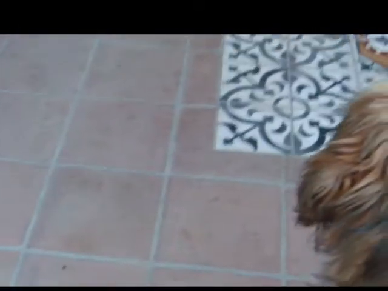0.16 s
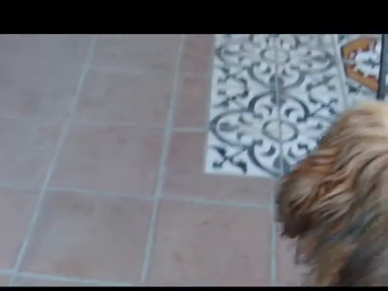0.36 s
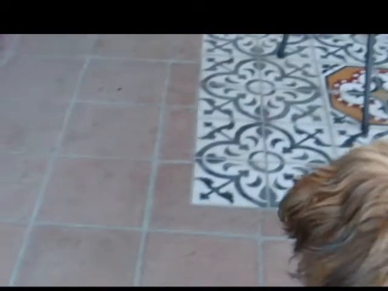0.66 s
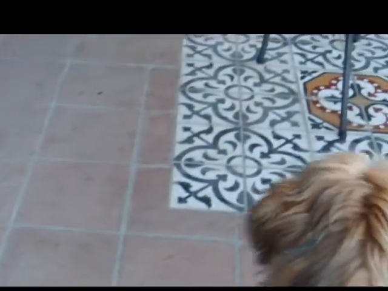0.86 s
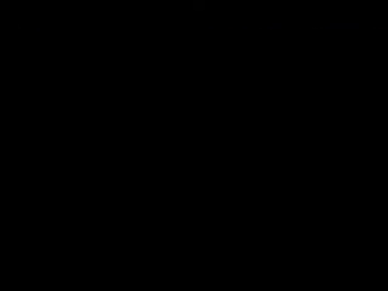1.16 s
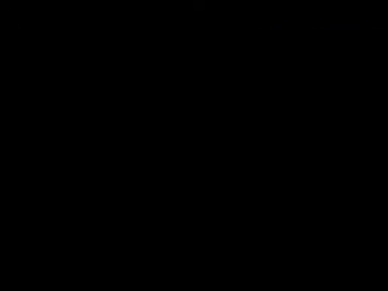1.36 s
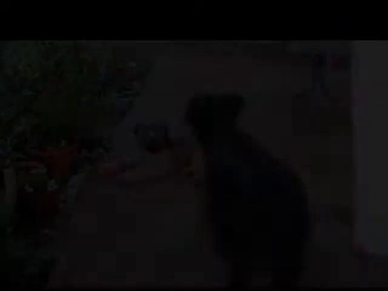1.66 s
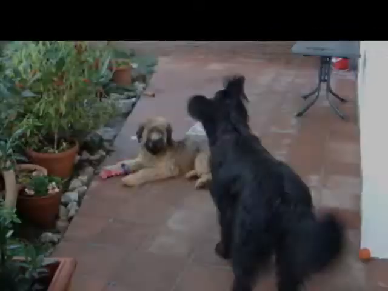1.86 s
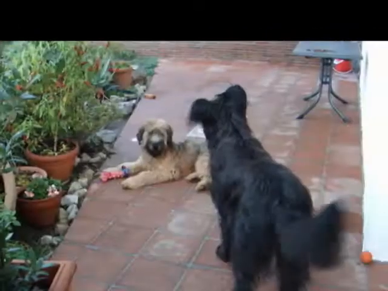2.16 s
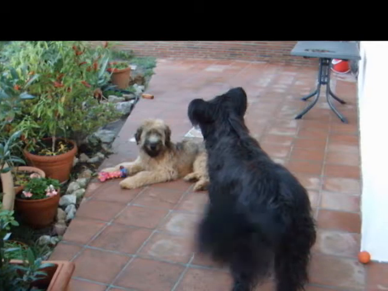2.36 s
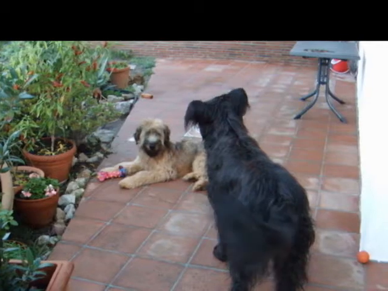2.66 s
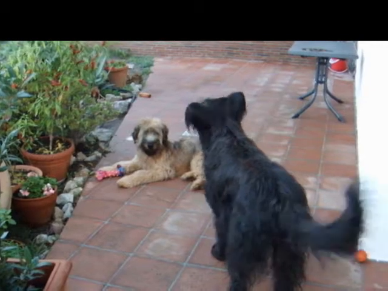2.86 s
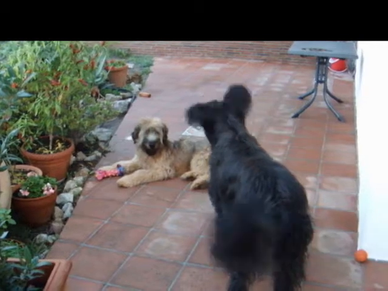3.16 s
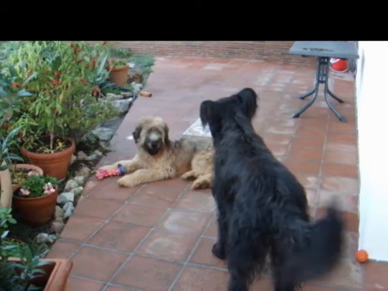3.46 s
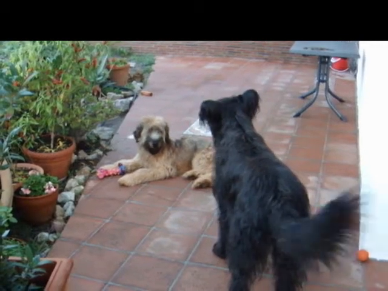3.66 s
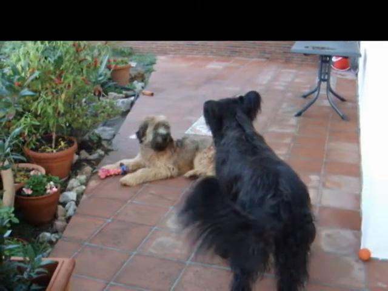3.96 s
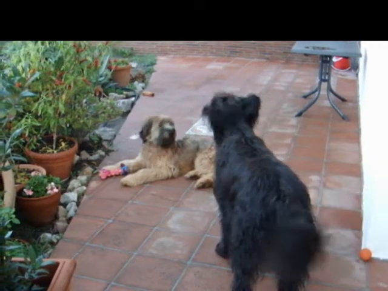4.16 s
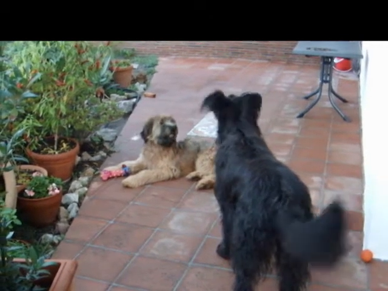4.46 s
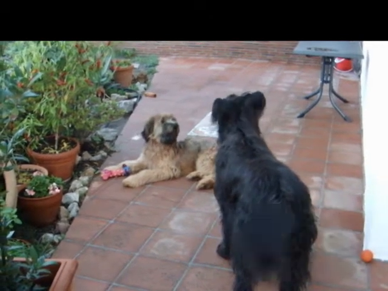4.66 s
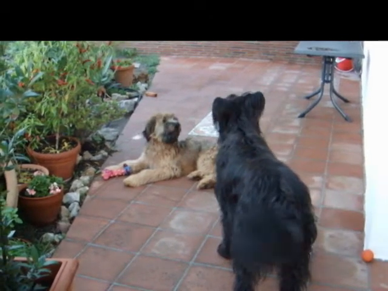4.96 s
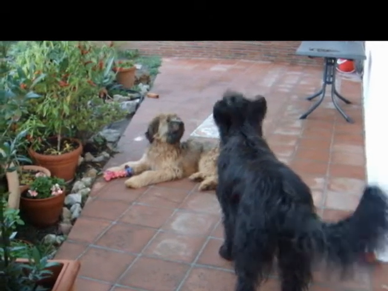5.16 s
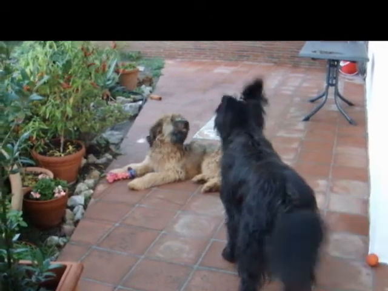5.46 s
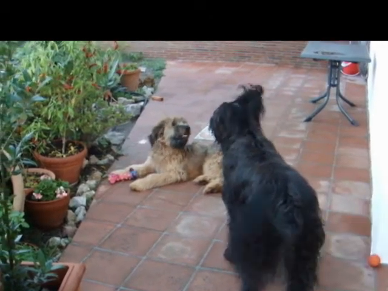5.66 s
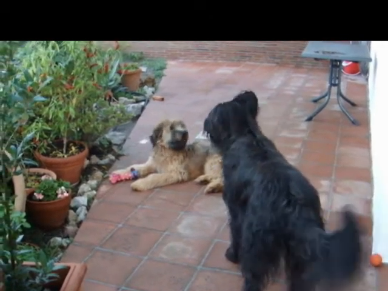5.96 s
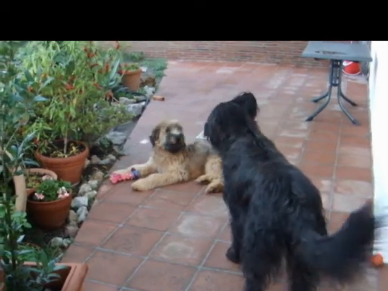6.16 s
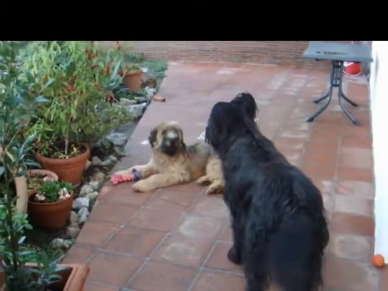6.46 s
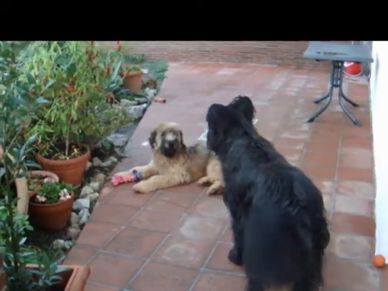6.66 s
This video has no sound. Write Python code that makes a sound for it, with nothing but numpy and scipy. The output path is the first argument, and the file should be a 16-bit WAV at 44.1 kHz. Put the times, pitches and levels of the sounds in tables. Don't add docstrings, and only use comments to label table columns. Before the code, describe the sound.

A large dog gives four loud single barks on a tiled terrace after a few sharp plastic clicks, with birds whistling and faint town hum.

```python
import sys
import numpy as np
from scipy import signal
from scipy.fft import rfft, irfft, next_fast_len
from scipy.io import wavfile
from scipy.ndimage import uniform_filter1d, map_coordinates

SR = 44100
rng = np.random.default_rng(int(sys.argv[2]) if len(sys.argv) > 2 else 0)


def rack_gain(trim_db):
    fader = np.asarray(trim_db, float)
    return 10 ** (fader / 20)


def pcm_store(signal):
    levels = np.round(np.clip(np.atleast_2d(signal), -1, 1) * 32767)
    wavfile.write(sys.argv[1], SR, levels.astype(np.int16).T)


N = 299698
T = np.arange(N) / SR

# full_voice_s, first_register_hz, second_register_hz, half_pitch_share (0-1), roughness (0-1)
BARK_VOICES = [
    (1.345, 604.5, 486.7, 0.14, .26),
    (2.62, 599.7, 495.4, 0.36, 0.37),
    (3.855, 600, 649.4, 0.56, 0.37),
    (4.89, 596.7, 505, 0.4, 0.29),
]


def unit(x):
    return x / np.sqrt(np.mean(np.abs(x) ** 2) + 1e-20)


def along(points, hz):
    point_hz, value = np.transpose(points)
    return np.interp(np.log(hz + 1), np.log(point_hz + 1), value)


def curves(rows, t=T):
    s, *columns = np.transpose(rows)
    return [np.interp(t, s, column) for column in columns]


def wobble(rate_hz, size=N):
    knots = rng.standard_normal(int(size * rate_hz / SR) + 4)
    return map_coordinates(knots, [np.arange(size) * rate_hz / SR])


def filtered(x, response):
    m = next_fast_len(len(x) + SR // 4)
    return irfft(rfft(x, m) * response(np.fft.rfftfreq(m, 1 / SR)), m)[:len(x)]


def resonances(modes, f):
    total = 0
    for k, (center_hz, width_hz, db) in enumerate(modes):
        damping = 1j * f * width_hz
        total = total + (-1) ** k * rack_gain(db) * damping / (center_hz ** 2 - f * f + damping)
    return total


def steep(f, low_hz, high_hz):
    return 1 / np.sqrt((1 + (low_hz / (f + 1)) ** 8) * (1 + (f / high_hz) ** 8))


def noise(response, patchy_db, size=N):
    z = signal.stft(rng.standard_normal(size + 512), nperseg=512)[2]
    field = uniform_filter1d(rng.standard_normal(z.shape), 6, 0)
    field = uniform_filter1d(field, 10, 1)
    patchy = signal.istft(z * rack_gain(patchy_db * unit(field)), nperseg=512)[1][:size]
    return unit(filtered(patchy, response))


def add(track, s, x):
    part = track[round(s * SR):][:len(x)]
    part += x[:len(part)]


def terrace(x, early_db, tail_db):
    # delay_s, level_db
    wall_echoes = [(.007, -18.5), (.013, -2.5), (.022, -7), (.037, -4), (.058, -10.5), (.092, -29.5),
                   (.17, -24.5), (.265, -32)]
    # frequency_hz, t60_s
    decay_times = [(200, 0.76), (500, 0.69), (1000, 0.51), (2000, 0.77), (6000, 0.18)]
    hz, t, z = signal.stft(rng.standard_normal(SR), SR, nperseg=256)
    decay_db = -60 * t / along(decay_times, hz)[:, None]
    answer = signal.istft(z * rack_gain(decay_db), SR, nperseg=256)[1][:SR]
    answer = rack_gain(tail_db) * answer / np.linalg.norm(answer)
    answer[0] = 1
    for delay_s, db in wall_echoes:
        answer[round(delay_s * SR)] += rack_gain(db + early_db)
    return signal.fftconvolve(x, answer)


def fold_registers(voice, flips, t):
    start_s, first_hz, second_hz, half, rough = voice
    flip_s, settle_s, onset_rough = 0.013, 0.031, 0.3
    first_pitch = first_hz * np.clip(1 - 0.06 * np.exp((start_s - t) / 0.015), 0.4, 1)
    second_pitch = second_hz * np.clip(1 - 0.35 * np.exp((start_s - t) / 0.022), 0.4, 1)
    surge_share, surge_after_s, surge_s = 0.0997, 0.0204, 0.01202
    first_pitch = first_pitch * (1 + surge_share * np.exp(-((t - start_s - surge_after_s) / surge_s) ** 2))
    first = np.full(len(t), 0.993)
    for s, share in flips:
        first = first + (share - first) * np.clip((t - s) / flip_s + 0.5, 0, 1)
    first = np.clip(first, 0, 1)
    second = np.sqrt(1 - first ** 2)
    rough = rough + onset_rough * np.exp(-np.maximum(t - start_s, 0) / settle_s)
    return [(first_pitch, first), (second_pitch, second)], half, rough


def dog():
    # time_s, level_db, mouth_opening_db
    bark_shapes = [
        [(1.24, -56, -3), (1.32, -40, -9), (1.35, -9.5, -13), (1.385, -17, 5.5), (1.41, -12, -8),
         (1.44, -20.5, 10.5), (1.47, -14.5, -2.5), (1.53, -25, -5.5), (1.56, -33.5, -30)],
        [(2.612, -51.5, -11), (2.622, -10, -10), (2.636, -12, -8), (2.665, -17, 6.5), (2.69, -12, -15),
         (2.72, -19, -3), (2.75, -14.5, -8.5), (2.81, -22.5, -12), (2.86, -54.5, -13)],
        [(3.842, -52, 0), (3.852, -21.5, -18), (3.89, -11, -8), (3.905, -26.5, 4), (3.918, -13, -6),
         (3.942, -25.5, 9.5), (3.96, -22, -14), (4.0, -36.5, 10), (4.04, -59.5, -8)],
        [(4.884, -37, -9), (4.895, -9.5, -12.5), (4.925, -18, 13), (4.945, -13, -5), (4.968, -22, 11),
         (4.985, -12.5, -7), (5.005, -23.5, -4), (5.03, -15.5, -1.5), (5.13, -45.5, -8)],
    ]
    # time_s, share left to the first register (0-1)
    register_flips = [
        [(1.391, 0.16)],
        [(2.652, 0.23)],
        [(3.9, 0.44), (3.95, 0.81)],
        [(4.92, .5), (4.945, 0.97), (5.015, 0.39)],
    ]
    yard_tail_db = [-16.5, -15, -28, -13.5]
    # frequency_hz, width_hz, level_db
    throat_modes = [(530.5, 173, 1.5), (1108, 470, -1), (1467, 410, -3.5), (1874, 168, -10),
                    (2330, 160, -16.5), (5540, 2800, -39)]
    jaw_db, jaw_s = -15.5, 0.024
    slack_s = 0.051
    drift = 0.014
    out = np.zeros(N)
    throat = lambda f: np.abs(resonances(throat_modes, f)) * steep(f, 300, 9000)
    k = np.arange(1, 13)[:, None]
    for rows, voice, flips, yard_db in zip(bark_shapes, BARK_VOICES, register_flips, yard_tail_db):
        t = np.arange(rows[0][0], rows[-1][0], 1 / SR)
        size = len(t)
        level_db, open_db = curves(rows, t)
        registers, half, rough = fold_registers(voice, flips, t)
        share = np.clip(rough, 0, 1)
        rasp = np.clip(1.7 * rough, 0, 0.9)
        low = noise(lambda f: throat(f) * steep(f, 380, 900), 2, size=size)
        high = noise(lambda f: throat(f) * steep(f, 800, 9000), 4.9, size=size)
        since_s = np.maximum(t - voice[0], 0)
        late_db = jaw_db * np.exp(-since_s / jaw_s)
        slack = np.where(k == 1, 1 - np.exp(-since_s / slack_s), 1)
        flutter = np.array([wobble(70.9, size=size) for _ in k])
        flutter_db = np.where(k == 2, 4, 12) * rough * flutter
        bark = 0
        for hz, gain in registers:
            jitter = 0.0796 * rough * wobble(149.5, size=size) + drift * wobble(30.13, size=size)
            phase = np.cumsum(np.pi * hz * (1 + jitter) / SR)
            lines = throat(k * hz / 2) * np.where(k % 2, half, 1) * slack
            lines = lines * rack_gain(open_db * (k > 2) + late_db * (k > 4))
            total = np.sqrt(np.sum(lines ** 2, 0) / 2)
            upper = np.sqrt(np.sum(lines[2:] ** 2, 0) / 2) / total
            lines = lines / total * np.sqrt(1 - np.where(k > 2, rasp, share) ** 2)
            voiced = np.sum(lines * rack_gain(flutter_db) * np.sin(k * phase), 0)
            breath = 0.87 * share * low + rasp * upper * high
            breath = breath * (1 + 0.58 * np.cos(2 * phase))
            bark = bark + gain * voiced + gain ** 2 * breath
        add(out, t[0], terrace(rack_gain(level_db) * bark, early_db=-7, tail_db=yard_db))

    def head_shade(f):
        return steep(f, 220, 20000) * steep(f, 20, 2650) ** 4 + rack_gain(-7) * steep(f, 4500, 5800) ** 2

    return filtered(out, head_shade)


def growl():
    # start_s, length_s, from_hz, to_hz, level_db
    chest_tones = [
        (1.24, .11, 94.8, 237, -39.5),
        (3.79, 0.0824, 91, 230, -38),
    ]
    out = np.zeros(N)
    for s, length_s, from_hz, to_hz, db in chest_tones:
        u = np.linspace(0, 1, int(length_s * SR))
        hz = from_hz * (to_hz / from_hz) ** u * (1 + 0.088 * wobble(80, size=len(u)))
        phase = np.cumsum(2 * np.pi * hz / SR)
        swell = rack_gain(db + 3 * wobble(60, size=len(u))) * np.sin(np.pi * u ** 1.7)
        add(out, s, swell * (np.sin(phase) + 0.4 * np.sin(2 * phase)))
    return out


def camera_clicks():
    # start_s, peak_db, snap_db, hollow_db
    contacts = [
        (0.06, -4, -44, -16),
        (0.15, -2, -38, -18),
        (0.479, -8, -14, -2.5),
        (0.506, -16, -33, 2),
        (0.512, -29, -21, 4),
        (0.517, -30, -24.5, -13),
        (0.524, -24.5, -9.5, -33),
        (0.526, -24, -21.5, -5),
        (0.528, -17, -24.5, -31),
        (0.533, -29, -16, -13),
    ]
    # frequency_hz, width_hz, level_db
    body_modes = [(740, 110, 2), (1000, 900, -1), (1720, 450, 7), (2700, 1000, -2), (3700, 800, 0),
                  (5200, 2000, -8)]
    blows, hollow, snaps = np.zeros((3, N))
    push = -np.hanning(11) / 6
    for s, db, snap_db, hollow_db in contacts:
        add(blows, s + 0.00155, rack_gain(db + 19.5) * push)
        add(hollow, s + 0.00118, rack_gain(db + hollow_db + 33) * push)
        snap = rack_gain(db + snap_db + 3.5 - 60 * T[:400] / 0.0084) * rng.standard_normal(400)
        add(snaps, s + 0.0014, snap)
    add(snaps, 2.772, rack_gain([-23]))
    ring = filtered(blows, lambda f: resonances(body_modes[1:], f) / (1 + (f / 9000) ** 4))
    ring = ring + filtered(hollow, lambda f: resonances(body_modes[:1], f))
    rattle = rack_gain(-22.5 - 60 * T[:1500] / 0.018) * rng.standard_normal(1500)
    ring = ring + signal.fftconvolve(ring, rattle)[:N]
    return ring + filtered(snaps, lambda f: steep(f, 2400, 10000))


def hand():
    # peak_s, rise_s, fade_s (both per 20 dB), rumble_db, rub_db
    grips = [
        (.172, .012, 0.23, -39.5, -73),
        (.424, .005, 0.02, -56, -42),
        (.49, 0.041, 0.02, -39.5, -43.5),
        (.62, 0.062, 0.4, -49.5, -71),
        (1.27, .06, 0.5, -50, -51.5),
        (1.346, 0.058, 0.04, -47.5, -46),
        (3.67, .07, 0.3, -49.5, -47.5),
        (3.78, 0.069, 0.2, -62, -43),
        (3.85, 0.075, .06, -48, -45.5),
    ]
    out = np.zeros(N)
    for s, rise_s, fade_s, rumble_db, rub_db in grips:
        t = np.arange(s - rise_s, s + 2 * fade_s, 1 / SR)
        grip_db = -20 * np.maximum((s - t) / rise_s, (t - s) / fade_s)
        rumble = noise(lambda f: steep(f, 25, 180), 0.82, size=len(t))
        rub = noise(lambda f: steep(f, 220, 830), 3, size=len(t))
        add(out, t[0], rack_gain(rumble_db + grip_db) * rumble)
        add(out, t[0], rack_gain(rub_db + grip_db) * rub)
    return out


def electronics_whine():
    # frequency_hz, level_db
    tones = [(7472, -88), (8021, -92), (11590, -101)]
    return sum(rack_gain(db + 4 + 3 * wobble(4)) * np.sin(2 * np.pi * hz * T) for hz, db in tones)


def whistles(notes, blur, early_db, tail_db):
    out = np.zeros(N)
    for s, length_s, start_hz, middle_hz, end_hz, db in notes:
        u = np.linspace(0, 1, int(length_s * SR))
        hz = start_hz * (2 * u - 1) * (u - 1) + middle_hz * 4 * u * (1 - u) + end_hz * u * (2 * u - 1)
        hz = hz * (1 + blur * wobble(250, size=len(u)))
        swell = np.sin(np.pi * u) ** 0.22 * rack_gain(db + 6 + 2.1 * wobble(111, size=len(u)))
        note = swell * np.sin(np.cumsum(2 * np.pi * hz / SR))
        add(out, s, terrace(note, early_db, tail_db))
    return out


def two_note_calls(calls, fall, arch, twin_db):
    twin, twin_after_s = (4750, 4280, 3980, 0.039), 0.0087
    notes = []
    for s, gap_s, tune, fall_db, arch_db in calls:
        parts = [(0, fall, fall_db), (twin_after_s, twin, fall_db + twin_db), (gap_s, arch, arch_db)]
        for after_s, note, db in parts:
            notes.append((s + after_s, note[3], *(tune * np.array(note[:3])), db))
    return notes


def near_birds():
    # start_s, arch_after_s, pitch_factor, fall_db, arch_db
    calls = [
        (1.195, 0.085, .99, -52, -51),
        (3.0, 0.099, 0.99, -51.5, -50),
        (5.408, .088, 1.0, -52, -48.5),
    ]
    # start_s, length_s, pitch_hz, level_db
    single_notes = [
        (1.544, .06, 3700, -65),
        (2.776, 0.025, 3430, -58.5),
        (6.338, .07, 3450, -48),
        (6.4, 0.048, 3107, -52.5),
    ]
    fall, arch = (4250, 3820, 3480, 0.072), (2480, 3000, 2480, 0.047)
    droop = np.array((0.97, 1.02, 0.93))
    notes = two_note_calls(calls, fall, arch, twin_db=-3)
    notes += [(s, length_s, *(hz * droop), db) for s, length_s, hz, db in single_notes]
    return whistles(notes, blur=0.014, early_db=-8, tail_db=-10)


def far_bird():
    # start_s, arch_after_s, pitch_factor, fall_db, arch_db
    calls = [
        (1.8, .12, 1.02, -61.5, -58),
        (2.82, .085, 1.03, -66, -59),
        (3.92, .085, 0.97, -63, -60),
        (5.18, .075, .95, -66.5, -60),
        (6.25, .065, .96, -61, -62.5),
    ]
    fall, arch = (4300, 3950, 4100, 0.1), (2680, 2850, 2580, 0.09)
    return whistles(two_note_calls(calls, fall, arch, twin_db=-12), blur=0.08, early_db=-2, tail_db=-2)


def insects():
    # start_s, length_s, level_db
    wing_bursts = [(.02, 0.044, -67), (.228, 0.17, -71.5), (0.778, 0.031, -68.5), (0.887, .033, -76),
                   (0.974, .073, -68.5), (1.08, 0.046, -66), (1.192, 0.05, -73), (1.304, .07, -66.5),
                   (1.522, 0.046, -71.5), (1.772, 0.05, -69), (1.857, .054, -69.5), (2.023, .046, -73),
                   (2.38, 0.065, -67), (2.475, 0.039, -66), (2.602, 0.03, -68), (2.85, .16, -70),
                   (3.338, 0.066, -75), (3.453, 0.089, -71), (3.581, 0.1, -63.5), (3.705, 0.21, -69),
                   (4.148, 0.28, -66), (4.478, 0.33, -65.5), (5.195, 0.3, -67.5), (5.586, .065, -71),
                   (5.733, 0.096, -66.5), (5.853, .2, -74), (6.051, .19, -64.5), (6.265, 0.11, -66.5),
                   (6.451, 0.029, -62), (6.496, 0.19, -69)]
    # frequency_hz, width_hz, level_db
    wing_modes = [(7380, 310, 0), (8496, 310, 4.5), (9300, 1300, -5), (10020, 200, -7), (11600, 1100, -15)]
    dip_db, dip_s, ramp_s = -9, 0.09, 0.015
    bursts = np.full(N, rack_gain(-74))
    for s, length_s, db in wing_bursts:
        whole_s = length_s + 2 * ramp_s
        add(bursts, s - ramp_s, rack_gain(db - 3) * signal.windows.tukey(int(whole_s * SR), 0.04 / whole_s))
    quiet_db = sum(dip_db * np.exp(-((T - s - dip_s) / dip_s) ** 4) for s, *_ in BARK_VOICES)
    hiss = noise(lambda f: resonances(wing_modes, f) * steep(f, 4500, 14000), patchy_db=3.5)
    return bursts * rack_gain(quiet_db + 2 * wobble(43)) * hiss


def town():
    # frequency_hz, level_db (per Hz)
    hum_spectrum = [(18, -15), (50, 0), (170, 2.5), (450, -1.5), (1400, -5.5), (3820, -20), (6300, -30.5),
                    (8800, -44.5)]
    # frequency_hz, width_hz, level_db
    street_bands = [(3750, 250, 0), (5100, 400, 3), (6800, 200, -3)]
    town_db, wash_db, wash_after_s, wash_s = -52, 2.5, 0.12, 0.14

    def hum(f):
        return rack_gain(along(hum_spectrum, f)) * steep(f, 22, 12000) * (1 + np.abs(resonances(street_bands, f)))

    lift_db = sum(wash_db * np.exp(-((T - s - wash_after_s) / wash_s) ** 2) for s, *_ in BARK_VOICES)
    return rack_gain(town_db + lift_db + 3 + 0.6 * wobble(6)) * noise(hum, 1.2)


def scene():
    animals = dog() + growl() + near_birds() + far_bird() + insects()
    camera = camera_clicks() + hand() + electronics_whine()
    return (animals + camera + town())[None]


def top_cut(x):
    return signal.sosfilt(signal.butter(12, 12820, fs=SR, output="sos"), x)


def record(dry):
    ceiling = 1.1
    limited = dry / (1 + np.abs(dry / ceiling) ** 6) ** (1 / 6)
    return top_cut(limited)


dry = scene()
out = record(dry)
pcm_store(out)
```